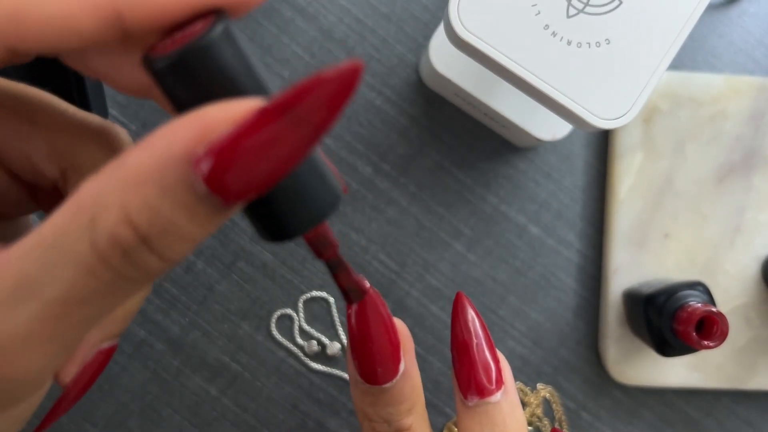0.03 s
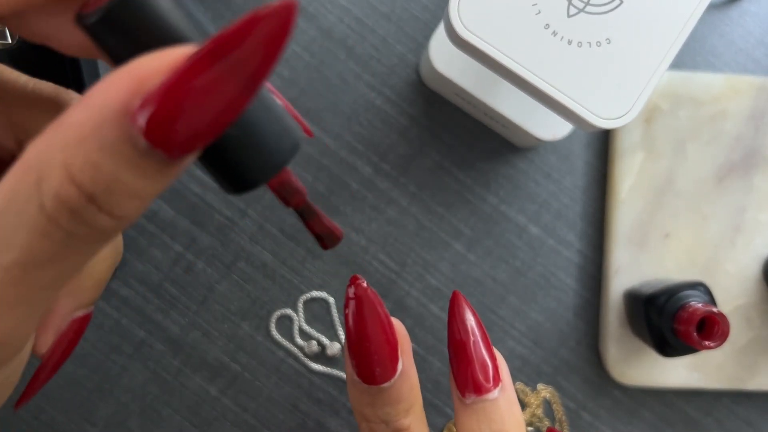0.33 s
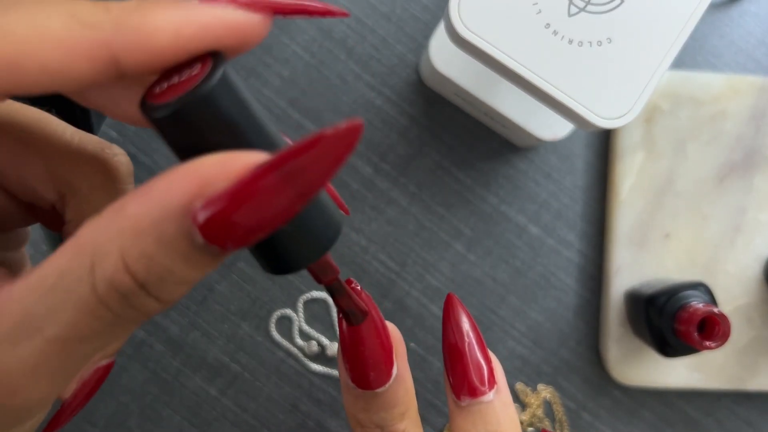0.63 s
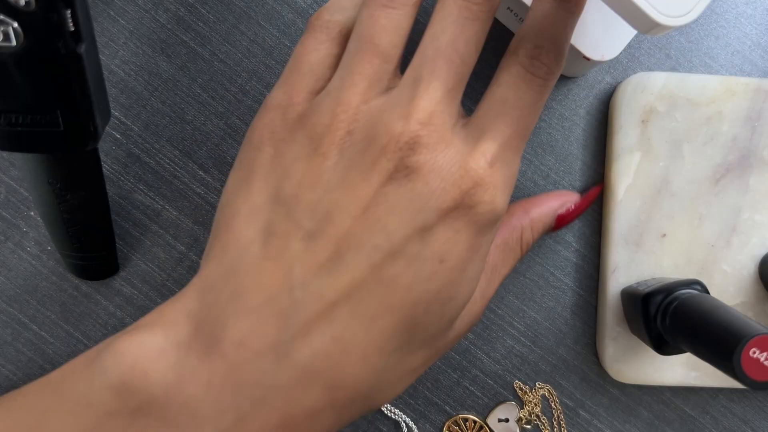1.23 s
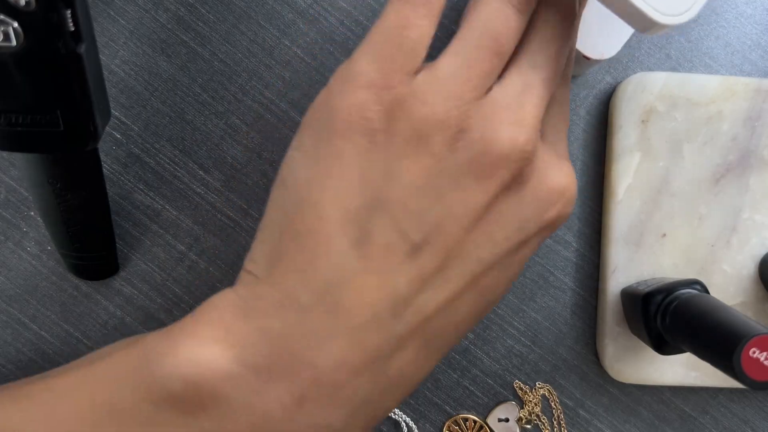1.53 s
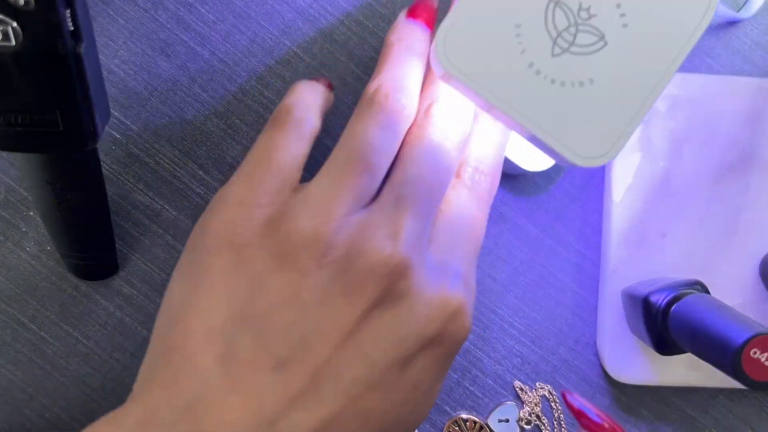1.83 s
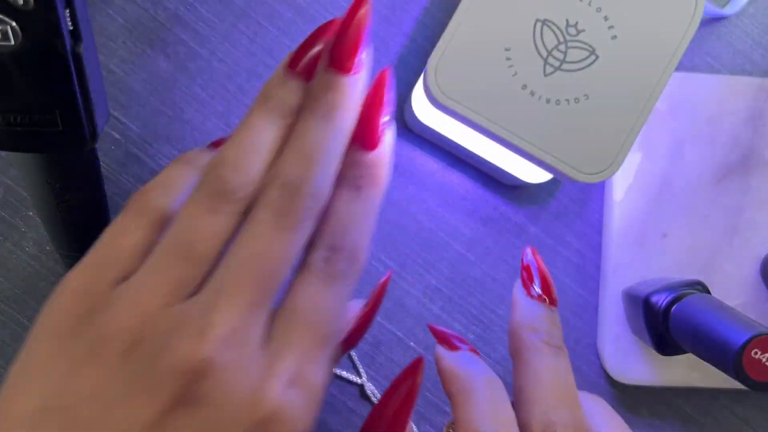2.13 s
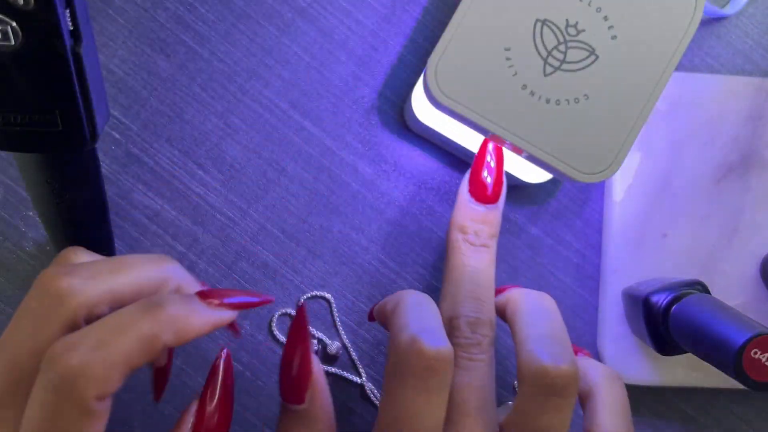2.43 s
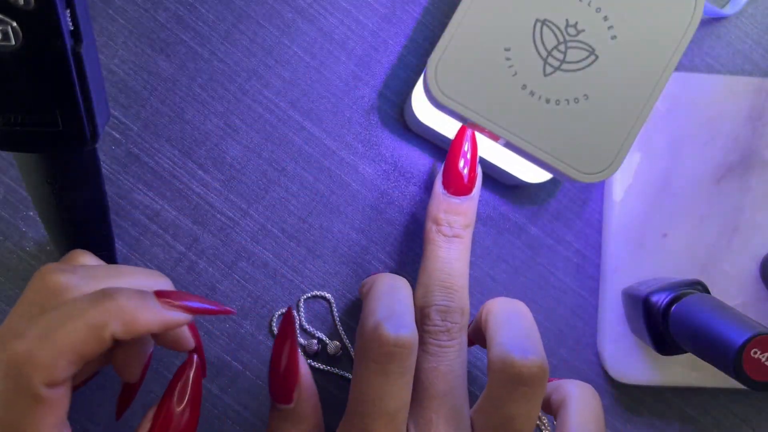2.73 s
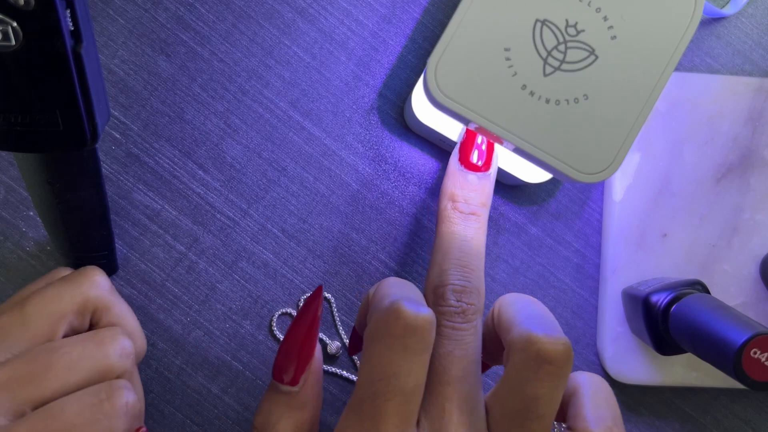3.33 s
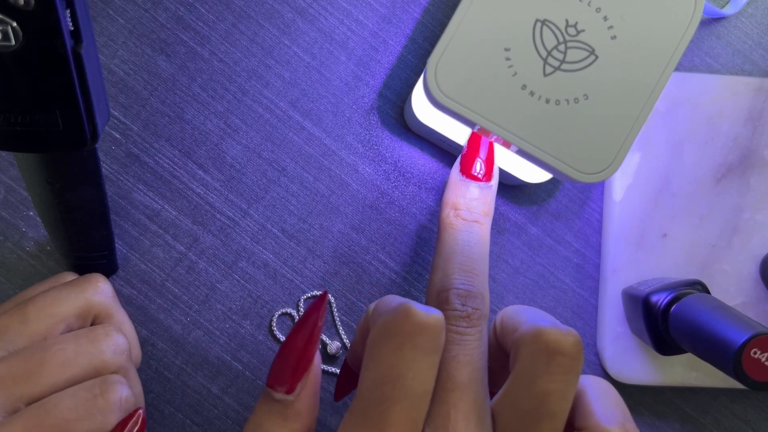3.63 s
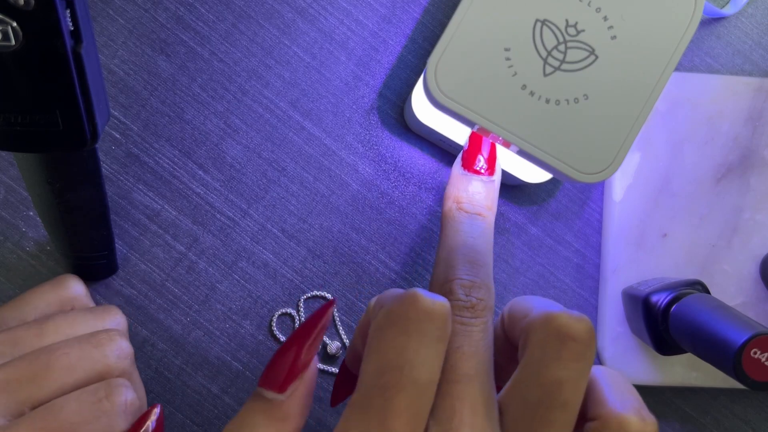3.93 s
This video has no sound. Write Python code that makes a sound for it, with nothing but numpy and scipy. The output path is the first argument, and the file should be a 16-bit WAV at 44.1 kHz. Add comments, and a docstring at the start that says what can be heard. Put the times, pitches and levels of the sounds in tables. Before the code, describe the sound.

A hand thuds softly on a table and slides over it, with one sharp click of a small lamp's plastic switch. Then fingers brush in a thin rustle and long nails tick faintly, heard close in a quiet room.

```python
"""A quiet room with a low rumble and a faint hum, heard close by a pair of microphone ports.
A hand thuds onto a table, clicks a small nail lamp on and slides back; the switch rings the lamp's
plastic shell, and skin friction excites the tabletop's resonances. Then fingers brush softly in a
thin rustle and long nails tick as they settle under the lamp."""
import sys
import numpy as np
from scipy import signal
from scipy.fft import rfft, irfft
from scipy.io import wavfile
from scipy.ndimage import uniform_filter1d

SR = 44100
rng = np.random.default_rng(int(sys.argv[2]) if len(sys.argv) > 2 else 0)


def master(y):
    """Save y as 16-bit WAV."""
    cut = np.clip(np.atleast_2d(y).T, -1, 1)
    pcm = np.round(cut * 32767)  # scale
    wavfile.write(sys.argv[1], SR, pcm.astype(np.int16))


N = 176400
T, FREQS = np.arange(N) / SR, np.fft.rfftfreq(N, 1 / SR)

# Left-right likeness of room sound and of close sound. Each row: frequency in Hz, correlation 0-1.
AIR_CORRELATION = [(100, 1), (300, 0.85), (550, 0), (900, 0.1), (1600, .15), (2000, 1), (2700, 0.5),
                   (3500, 0.7), (4300, 0), (5200, 0.79), (10000, 1), (15000, .6)]
NEAR_CORRELATION = [(200, 1), (600, .9), (1100, 0.68), (2200, 0.9), (7500, 0.63), (10000, 0.88), (12000, 1),
                    (14500, 0.48)]


def amp(db):
    """Decibels to gain."""
    return 10 ** (np.asarray(db) / 20)


def unit_rms(x):
    """Scales to an rms of one."""
    return x / np.sqrt(np.mean(x ** 2) + 1e-20)


def curve(points):
    """Interpolates a table over log frequency."""
    hz, value = np.transpose(points)
    return np.interp(np.log(FREQS + 1), np.log(hz + 1), value)


def below(hz):
    """Soft low-pass gain: one under hz, zero above."""
    return 1 / (1 + (FREQS / hz) ** 4)


def peaks_db(peaks):
    """Resonant peaks as dB over frequency."""
    return sum(db / (1 + (2 * (FREQS - hz) / width_hz) ** 2) for hz, width_hz, db in peaks)


def colour(x, db):
    """Minimum-phase filter with the given gain at each frequency."""
    log_gain = np.log(amp(db))
    mirrored = np.r_[log_gain, log_gain[-2:0:-1]]
    phase = -signal.hilbert(mirrored).imag[:len(FREQS)]
    return irfft(rfft(x) * np.exp(log_gain + 1j * phase), N)


def stereo(two, correlation):
    """Blends two independent signals into a partly alike left and right."""
    a, b = rfft(two)
    alike = np.clip(curve(correlation), 0, 1)
    mid, side = np.sqrt((1 + alike) / 2) * a, np.sqrt((1 - alike) / 2) * b
    return irfft([mid + side, mid - side], N)


def noise(correlation):
    """Stereo white noise."""
    return stereo(rng.standard_normal((2, N)), correlation)


def friction(slips_per_s, spread_db, hiss):
    """Dense tiny slips of uneven size over a smooth hiss."""
    sizes = amp(spread_db * np.minimum(rng.exponential(1, N), 4))
    slips = sizes * (rng.random(N) < slips_per_s / SR)
    grains = (hiss + unit_rms(slips)) * rng.standard_normal((2, N))
    return unit_rms(stereo(grains, NEAR_CORRELATION))


def stroke(full_s, rise_s, hold_s, fall_s):
    """Envelope of one movement; rise_s and fall_s each span 20 dB."""
    decades = np.maximum(full_s - T, 0) / rise_s + np.maximum(T - full_s - hold_s, 0) / fall_s
    return 10 ** -np.minimum(decades, 10)


def decay(start_s, t60_s):
    """Sudden start and exponential decay."""
    return (T >= start_s) * np.exp(-np.log(1000) * np.clip((T - start_s) / t60_s, 0, 10))


def room_air():
    """Still air: steady dark noise with a few resonances."""
    # Each row: frequency in Hz, gain in dB.
    spectrum = [(15, -48), (32, -34.5), (45, -27.5), (95, -21.5), (120, -25.5), (145, -33.5), (175, -29),
                (230, -36.5), (300, -43), (450, -47.5), (700, -53.5), (1000, -56.5), (1500, -60.5),
                (2000, -63), (2500, -64.5), (3600, -69.5), (4500, -76.5), (6000, -80.5), (8000, -88),
                (9600, -89.5), (11000, -91.5), (15000, -98)]
    # Each row: centre in Hz, width in Hz, lift in dB.
    resonances = [(970, 120, 2), (1930, 170, 4.5), (2860, 170, 2.5), (3380, 130, 2.5), (9650, 270, 4.5)]
    return colour(noise(AIR_CORRELATION), curve(spectrum) + peaks_db(resonances))


def machine_hum():
    """Two faint partials that waver and die down."""
    # Each row: frequency in Hz, level in dB.
    partials = [(233, -52.5), (349, -69)]
    # Each row: time in seconds, gain in dB.
    fade = [(0, 2.5), (.42, -2), (.57, -11), (.72, -1.5), (.88, -3), (1.05, 2), (1.28, -6), (1.5, -29)]
    hum = sum(np.sqrt(2) * amp(db) * np.sin(2 * np.pi * hz * T) for hz, db in partials)
    return hum * amp(np.interp(T, *np.transpose(fade)))


def building_rumble():
    """Low rolling noise, levelled, then made to swell and sink."""
    # Each row: frequency in Hz, relative gain in dB.
    spectrum = [(20, -70.5), (32, -51.5), (46, -19), (55, 2.5), (68, 5.5), (80, 7), (89, -4), (100, -32),
                (160, -54), (600, -150)]
    # Each row: frequency in Hz, left-right correlation 0-1.
    correlation = [(30, .999), (200, .998)]
    # Each row: time in seconds, level in dB.
    swells = [(0.05, -31), (0.08, -45), (0.19, -36.5), (0.56, -36.5), (0.59, -58.5), (0.64, -29),
              (0.69, -44), (0.72, -36.5), (1.94, -39.5), (2.09, -32), (2.16, -43), (2.2, -33), (2.6, -36),
              (2.62, -25.5), (2.66, -46), (2.74, -32), (2.83, -44), (2.87, -32.5), (2.95, -45), (2.98, -37),
              (3.13, -31.5), (3.18, -41), (3.4, -42), (3.44, -32), (3.48, -42), (3.7, -36), (3.72, -43),
              (3.76, -32.5), (3.93, -38)]
    window_s = 0.076
    roll = colour(noise(correlation), curve(spectrum))
    power = uniform_filter1d((roll ** 2).mean(0), int(window_s * SR))
    return roll / np.sqrt(abs(power) + 1e-20) * amp(np.interp(T, *np.transpose(swells)))


def finger_brushes():
    """Barely touching skin and nail make a thin high rustle."""
    # Each row: time of full level, rise, hold and fall in seconds, level in dB, body gain in dB.
    strokes = [(0.382, 0.028, 0.017, 0.034, -23.5, -2), (2.111, 0.085, 0.071, .25, 4, 2),
               (2.43, 0.51, .09, .15, -8.5, 15.5), (2.668, 0.065, .03, 0.037, -7.5, 8),
               (2.897, 0.025, 0.015, .02, -1, -11.5), (2.964, 0.0085, 0.022, .2, 6, -11),
               (2.994, 0.014, 0.0091, 0.023, 10, -2), (3.113, .05, 0.033, 0.032, 6, -14.5),
               (3.303, .05, 0.048, 0.099, -13, -3.5)]
    # Each row: frequency in Hz, gain in dB.
    spectrum = [(1000, -92.5), (3500, -74), (5500, -84), (8000, -79.5), (10500, -76.5), (14500, -72),
                (16000, -76.5)]
    rub = friction(slips_per_s=2900, spread_db=-1.5, hiss=0.5)
    body = irfft(rfft(rub) * below(hz=8650), N)
    drive = sum(stroke(*timing_s) * amp(db) * (rub + (amp(body_db) - 1) * body)
                for *timing_s, db, body_db in strokes)
    return colour(drive, curve(spectrum))


def hand_thuds():
    """The hand's weight on the table: low damped sines."""
    # Each row: start in seconds, frequency in Hz, level in dB, t60 in seconds.
    thuds = [(1.269, 118.2, -34.5, 0.25), (1.469, 176, -49, 0.39), (2.027, 233, -46, 0.25)]
    return sum(amp(db) * decay(start_s, t60_s) * np.sin(2 * np.pi * hz * (T - start_s))
               for start_s, hz, db, t60_s in thuds)


def nail_taps():
    """Nails tick in short dry bursts of noise."""
    # Each row: start in seconds, level in dB, body gain in dB.
    taps = [(1.2714, -2.5, 13.5), (1.306, 4, -31), (1.683, 11.5, 7.5), (2.523, -14.5, -11.5),
            (2.5405, -9.5, -7), (2.6145, -15, -6.5), (2.6772, -19.5, -4.5), (3.199, -18, -18)]
    # Each row: frequency in Hz, gain in dB.
    spectrum = [(150, -38), (600, -62), (1200, -40.5), (3300, -41.5), (4800, -43), (5800, -42.5),
                (7500, -49.5), (12000, -48.5), (15500, -51.5)]
    tick = noise(NEAR_CORRELATION)
    body = irfft(rfft(tick) * below(hz=4150), N)
    drive = sum(amp(db) * decay(start_s, t60_s=0.027) * (tick + (amp(body_db) - 1) * body)
                for start_s, db, body_db in taps)
    return colour(drive, curve(spectrum))


def hand_slides():
    """Dragged skin excites the table's resonances; each stroke rasps at its own pitch."""
    # Each row: time of full level, rise, hold and fall in seconds, level, bass and treble in dB,
    # rasp centre in Hz, rasp gain in dB.
    strokes = [(1.274, 0.0042, 0.0031, 0.079, -28, 21, 14.5, 2390, -20),
               (1.314, 0.017, .024, 0.027, -21, 5.5, 1, 1940, 8),
               (1.51, 0.049, 0.027, 0.056, -18.5, 14, 5, 1450, 6),
               (1.38, 0.0475, 0.03, 0.095, -39, 0.5, 7, 1594, -10),
               (1.621, .04, 0.043, 0.046, -24, 15, 6, 1610, 1),
               (1.682, 0.048, 0.056, 0.067, -2, -10.5, 1.5, 2450, 4.5),
               (1.688, 0.011, 0.041, 0.098, -16.5, 4.5, -11, 402, 23),
               (1.821, 0.097, 0.032, 0.062, -21, 10, 2, 1566, 8),
               (1.941, 0.18, 0.013, 0.11, -26.5, 15, 3, 795, -8)]
    # Each row: frequency in Hz, gain in dB.
    spectrum = [(100, -43.5), (250, -24.5), (420, -30.5), (700, -32), (1150, -31), (1600, -25.5),
                (2400, -28.5), (3200, -27), (4200, -32.5), (5700, -37.5), (8000, -42.5), (11000, -44),
                (15500, -48)]
    # Tabletop and the things on it. Each row: centre in Hz, width in Hz, lift in dB.
    resonances = [(380.6, 15, 8), (406, 20, 4.5), (625, 20, 8.5), (784, 110, 10.5), (1025, 35, 3.5),
                  (1518, 35, 2), (1574, 25, 7.5), (1615, 54, 3.5), (2010, 150, 4.5), (2166, 49, 4.5),
                  (2470, 50, 8.5), (2800, 50, 2.5), (2907, 33, 4), (3580, 33, 6)]
    bass, treble = below(hz=810), 1 - below(hz=4500)
    rasp_width_ratio = 0.29
    rub_bins = rfft(friction(slips_per_s=5000, spread_db=2, hiss=1))
    drive = 0
    for *timing_s, db, bass_db, treble_db, rasp_hz, rasp_db in strokes:
        rasp = amp(rasp_db) / (1 + (2 * (FREQS / rasp_hz - 1) / rasp_width_ratio) ** 2)
        tone = 1 + (amp(bass_db) - 1) * bass + (amp(treble_db) - 1) * treble + rasp
        drive += amp(db) * stroke(*timing_s) * irfft(rub_bins * tone, N)
    return colour(drive, curve(spectrum) + peaks_db(resonances))


def lamp_switch():
    """The switch gives way, then snaps, ringing the lamp's plastic shell."""
    # Each row: start in seconds, level in dB.
    blows = [(1.463, -22), (1.4657, -25.5), (1.469, 0.5)]
    # Each row: frequency in Hz, level in dB, t60 in seconds.
    shell_modes = [(697, -41.5, 0.064), (994, -40.5, 0.076), (1605, -34, 0.065), (2050, -22, 0.013),
                   (2180, -31, 0.017), (2360, -39, 0.035), (3020, -24.5, .025), (3200, -33, 0.01),
                   (5860, -54, 0.0097), (11000, -37, 0.0072), (12730, -35, 0.0084), (14400, -36, 0.0124)]
    # Each row: frequency in Hz, gain in dB.
    snap_spectrum = [(200, -28.5), (700, -20), (2500, -13.5), (3400, -15.5), (4200, -31.5), (6000, -30.5),
                     (9000, -38), (12000, -33.5), (15000, -25)]
    impulses = np.zeros(N)
    for start_s, db in blows:
        impulses[round(start_s * SR)] += amp(db)
    t = T[:SR // 4]
    shell = sum((-1) ** (k // 2) * amp(db - 60 * t / t60_s) * np.sin(2 * np.pi * hz * t)
                for k, (hz, db, t60_s) in enumerate(shell_modes))
    snap = noise(NEAR_CORRELATION) * sum(amp(db) * decay(start_s, t60_s=0.027) for start_s, db in blows)
    return signal.oaconvolve(impulses, shell)[:N] + colour(snap, curve(snap_spectrum))


def room_reverb(x):
    """A diffuse tail whose treble dies first."""
    # Each row: frequency in Hz, t60 in seconds.
    decay_times = [(200, 0.93), (800, 1), (2000, 0.38), (5000, 0.29), (14000, 0.26)]
    hz, t, bins = signal.stft(noise(AIR_CORRELATION)[:, :SR], SR, nperseg=256)
    t60_s = np.interp(hz, FREQS, curve(decay_times))[:, None]
    tail = signal.istft(bins * amp(-60 * t / t60_s), SR, nperseg=256)[1]
    tail[:, :SR // 200] = 0  # 5 ms pre-delay
    return signal.fftconvolve(x, tail / np.linalg.norm(tail[0]), axes=1)[:, :N]


def scene():
    """Hand and lamp, close by, in the room."""
    reverb_db = -14.5
    close = hand_slides() + finger_brushes() + nail_taps() + hand_thuds() + lamp_switch()
    return close + room_reverb(amp(reverb_db) * close) + building_rumble() + room_air() + machine_hum()


def record(dry):
    """The left port hears a little late and weak; both are band-limited."""
    # Each row: frequency in Hz, left level against right in dB.
    balance = [(30, -.3), (70, -.4), (160, -1.4), (350, -.6), (1400, -.8), (2700, -2.2), (5000, .2),
               (14000, -.2)]
    # Each row: frequency in Hz, left phase lag in radians.
    lag = [(20, 0), (200, 0), (600, .05), (1200, .8), (2400, 1.6), (3600, 1), (4900, 3.1), (6200, 4.6),
           (7500, 5.3), (9000, 6.28), (12200, 6.28), (15500, 8.3)]
    cutoff_hz = 15950
    left = amp(curve(balance)) * np.exp(-1j * curve(lag))
    ports = irfft([left, np.ones(len(FREQS))], N)
    port_firs = np.roll(ports, 512, 1)[:, :1025] * np.hanning(1025)
    lowpass = signal.firwin(511, cutoff_hz, window=("kaiser", 9), fs=SR)
    padded = np.pad(dry, ((0, 0), (767, 767)), "reflect", reflect_type="odd")  # half of each filter
    heard = signal.oaconvolve(padded, port_firs, "valid", axes=1)
    return signal.oaconvolve(heard, lowpass[None], "valid", axes=1)


dry = scene()
out = record(dry)
master(out)
```